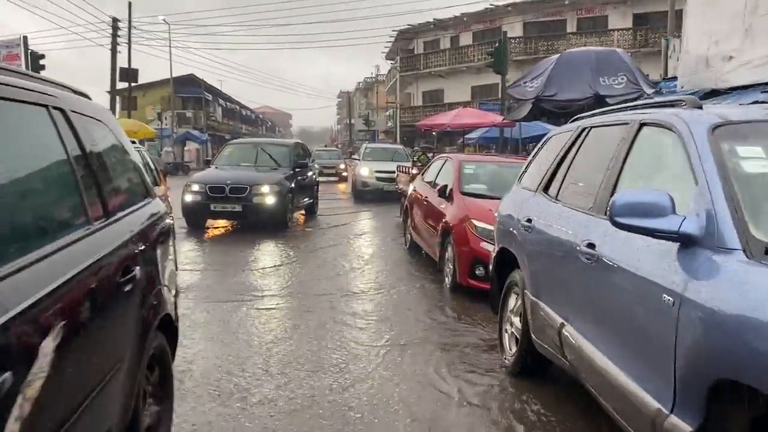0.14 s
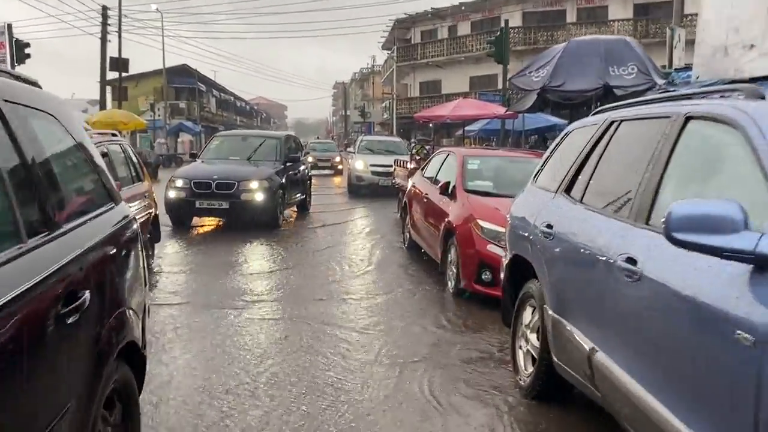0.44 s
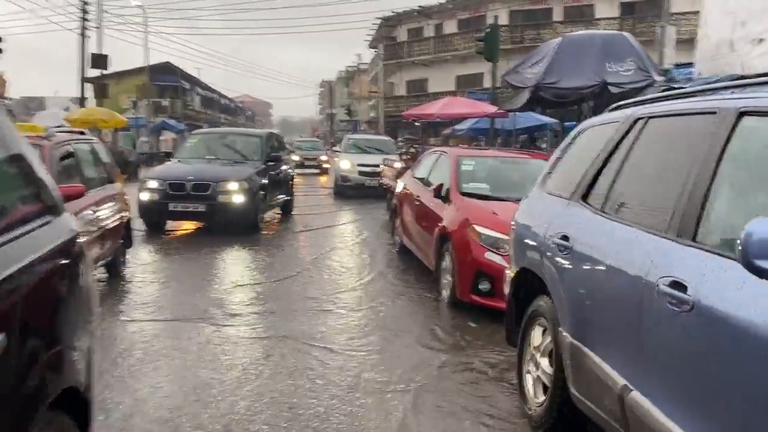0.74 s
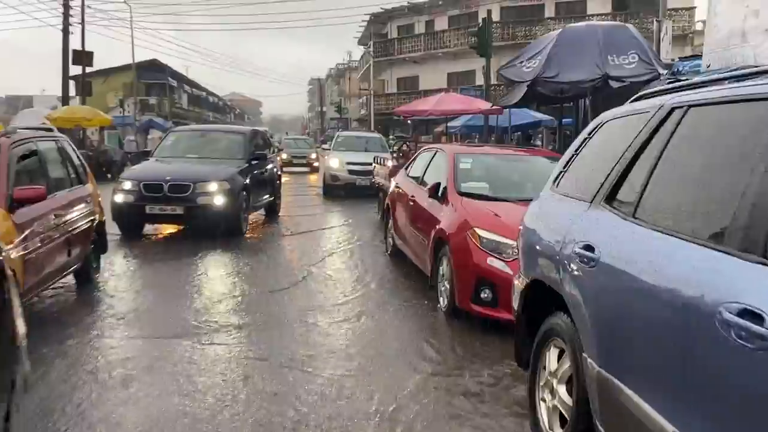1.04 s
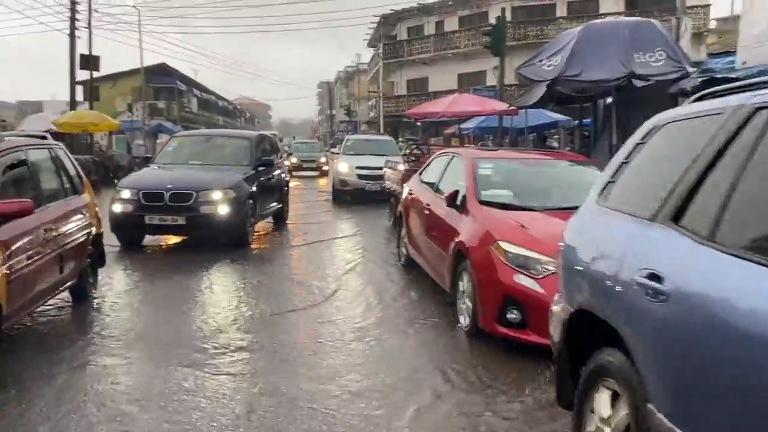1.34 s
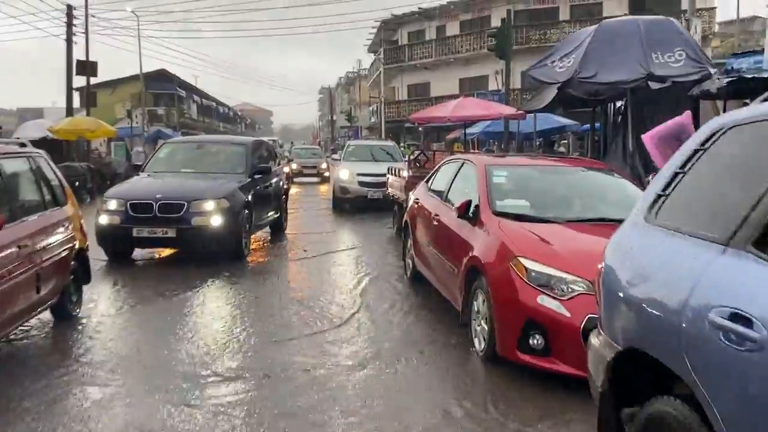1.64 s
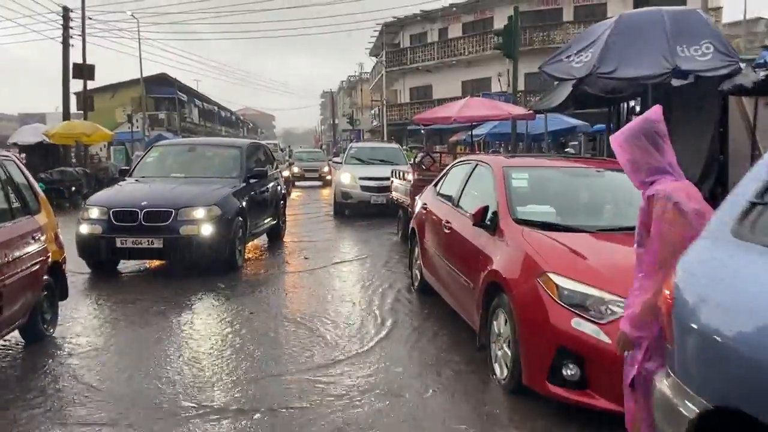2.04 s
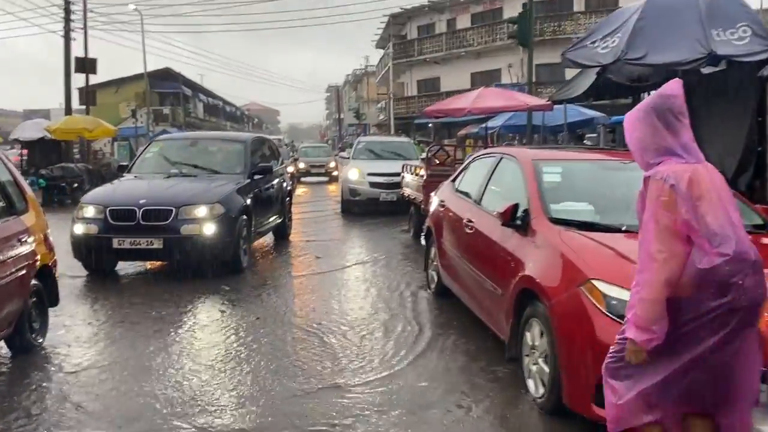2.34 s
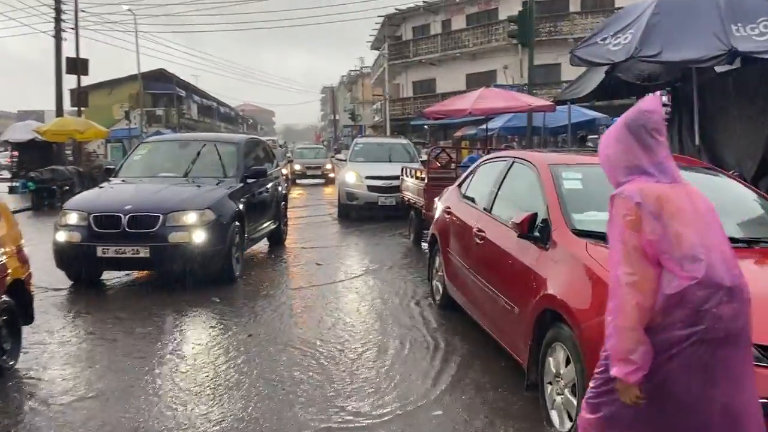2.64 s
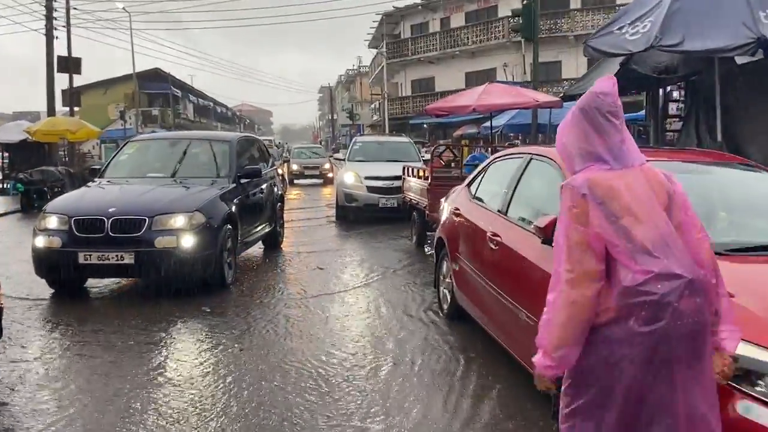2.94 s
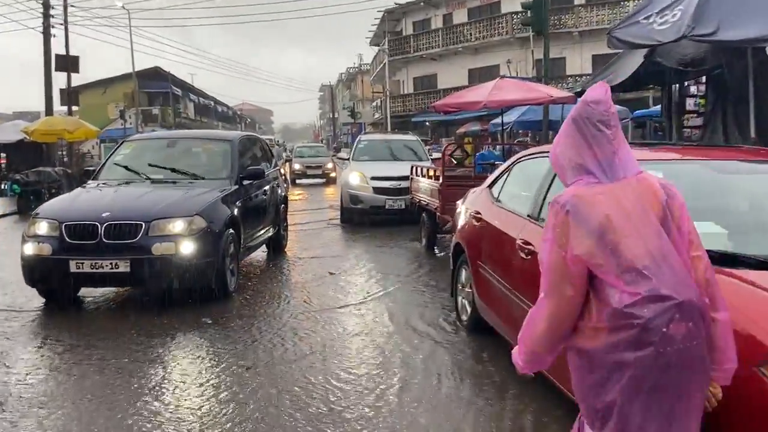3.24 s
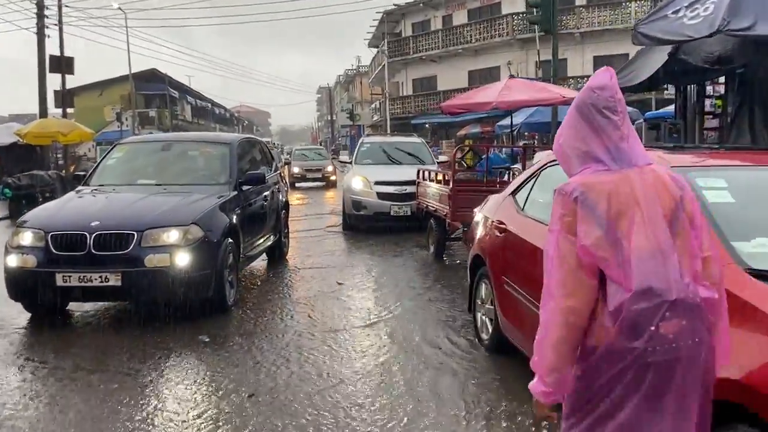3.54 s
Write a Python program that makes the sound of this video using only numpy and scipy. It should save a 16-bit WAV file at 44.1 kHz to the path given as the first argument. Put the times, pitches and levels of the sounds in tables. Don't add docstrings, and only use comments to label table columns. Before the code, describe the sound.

Dense rain hisses steadily outdoors, close to a stereo microphone. A faint, thin brake whistle comes early, brief watery splashes and drips follow, and a low pulsing engine idle rises in speed near the end.

```python
import sys
import numpy as np
from scipy import signal
from scipy.fft import rfft, irfft
from scipy.io import wavfile
from scipy.ndimage import uniform_filter1d

SR = 44100
rng = np.random.default_rng(int(sys.argv[2]) if len(sys.argv) > 2 else 0)


def master_out(mix):
    frames = np.transpose(np.atleast_2d(mix))
    ceiling = np.clip(frames, -1, 1)
    pcm = np.round(ceiling * 32767).astype(np.int16)
    wavfile.write(sys.argv[1], SR, pcm)


def natural_amplitude(level_db):
    exponent = np.asarray(level_db, float) / 20
    return 10 ** exponent


N = 163170
T = np.arange(N) / SR
HZ = np.maximum(np.arange(N // 2 + 1) * SR / N, 1.0)
LEFT_ONLY = np.array([[1], [0]])


def over_hz(table, hz=HZ):
    table = np.array(table)
    return np.interp(np.log(hz), np.log(table[:, 0]), table[:, 1])


def over_s(table):
    table = np.array(table)
    return np.interp(T, table[:, 0], table[:, 1])


def unit(x):
    return x / np.sqrt(np.mean(x ** 2))


def walk(rate_hz):
    hold = int(SR / rate_hz)
    steps = np.repeat(rng.standard_normal(N // hold + 1), hold)
    wander = uniform_filter1d(uniform_filter1d(steps, hold), hold)[:N]
    return (wander - wander.mean()) / wander.std()


def noise():
    return rng.standard_normal((2, N))


def filtered(x, gain):
    return irfft(rfft(x) * gain, N)


def banded(make, table, slow_db, quick_db):
    out = np.zeros((2, N))
    shared = walk(5.03)
    for hz in 25 * 2 ** (np.arange(28) / 3):
        if over_hz(table, hz) < -30 or hz < table[0][0] / 2:
            continue
        shape = np.cos(np.clip(3 * np.log2(HZ / hz), -1, 1) * np.pi / 2)
        spec = rfft(make(hz)) * shape
        density = np.sqrt(np.mean(abs(spec) ** 2) / np.mean(shape ** 2))
        band = irfft(spec / density * natural_amplitude(over_hz(table)), N)
        out += band * natural_amplitude(slow_db * shared + quick_db * walk(14))
    return unit(out)


def rain():
    # pitch_hz, level_db per Hz
    spectrum = [(150, -24), (500, -4), (1000, 2), (2100, -4), (4500, -12), (7000, -17), (11000, -21),
                (13000, -27.5), (15500, -29)]
    # time_s, level_db
    downpour = [
        (0, 0.5),
        (.6, 0.2),
        (1.3, -0.7),
        (1.8, -0.4),
        (2.6, -0.7),
        (3.1, 0.1),
        (3.7, 0.5),
    ]
    drops_per_s, size_db, drop_cycles = 2500, 1, 1.8
    chance = rng.random((2, N))
    hits = (chance[0] < drops_per_s / SR) * natural_amplitude(-size_db * np.log(chance[1] + 1e-9))

    def drops(hz):
        if hz < 280:
            return noise()
        struck = hits * (rng.random(N) < 0.3) * noise()
        pole = np.exp((2j * np.pi - 2 / drop_cycles) * hz / SR)
        ring = signal.lfilter([1], [1, -pole], struck).imag
        patter_db = -12.5 + 2.5 * np.log2(hz / 6000)
        return unit(noise()) + natural_amplitude(patter_db) * unit(ring)

    return banded(drops, spectrum, 0.057, 0.51) * natural_amplitude(-27.5 + over_s(downpour))


def traffic():
    # pitch_hz, level_db per Hz
    spectrum = [(25, -9.5), (55, -1.5), (85, 1), (125, -7), (170, -9), (380, -9.5), (600, -12.5),
                (1200, -36.5)]
    # time_s, level_db
    nearness = [
        (0, 1.5),
        (.4, 3),
        (.8, 2.5),
        (1.2, 1.5),
        (1.5, 1),
        (2.3, 1),
        (2.7, 1),
        (3.1, 2),
        (3.7, 1),
    ]
    # pitch_hz, level_db, unsteadiness_db
    motors = [(85, -62, -2), (148.4, -53, 8), (230.5, -48, 1), (378.4, -50.5, -0.5), (500, -42, 2.5),
              (695, -42.5, -1)]
    rumble = banded(lambda hz: noise(), spectrum, 0.47, 0.64) * natural_amplitude(-28.5 + over_s(nearness))
    hums = np.zeros(N)
    for hz, db, sway_db in motors:
        level = natural_amplitude(db + 1.0 + sway_db * walk(4))
        cycles = np.cumsum(hz * (1 + 0.0016 * walk(2.877))) / SR
        hums += level * np.sin(2 * np.pi * cycles)
    return rumble + hums * LEFT_ONLY


def engine():
    # time_s, level_db
    loudness = [(0, -16.5), (.3, -6), (.7, -5.5), (1.1, -4), (1.9, -1.5), (2.3, -3.5), (2.6, -2),
                (2.75, -4), (2.9, 0), (3.05, -1.5), (3.25, 0), (3.7, -3.5)]
    # time_s, cycle_hz
    speed = [
        (0, 7.29),
        (.55, 7.29),
        (.7, 7.25),
        (2.62, 7.25),
        (2.74, 7.5),
        (2.9, 8.45),
        (3.05, 9.35),
        (3.25, 9.6),
        (3.7, 9.25),
    ]
    # multiple of the cycle, idle_db, halfway_db, revved_db, polarity
    harmonics = [(4, -52, -37, -26, -1), (5, -46, -35, -31, -1), (6, -44, -30, -26.5, 1),
                 (7, -25.5, -37, -46, 1), (8, -15.5, -23, -39, 1), (9, -35, -33, -27, 1),
                 (12, -41, -42, -32, 1), (16, -37, -46, -50, 1)]
    # time_s, level_db
    unevenness = [
        (0, -8),
        (.7, -9),
        (1.0, 0),
        (1.6, 1),
        (1.9, 2.5),
        (2.3, 1.5),
        (2.6, 0),
        (3.7, -1),
    ]
    idle_hz, revved_hz, beat_at_s = 7.3, 9.3, 2.0336
    rate = over_s(speed)
    turns = np.cumsum(rate) / SR
    turns = turns - np.interp(beat_at_s, T, turns)
    throttle = (rate - idle_hz) / (revved_hz - idle_hz)
    out = np.zeros(N)
    for order, idle_db, half_db, revved_db, polarity in harmonics:
        order = round(order)
        weight_db = np.interp(throttle, [0, 0.5, 1], [idle_db, half_db, revved_db])
        lope_db = order % 2 * over_s(unevenness)
        level_db = 3.5 + weight_db + over_s(loudness) + lope_db + 0.35 * walk(4.76)
        out += np.sign(polarity) * natural_amplitude(level_db) * np.cos(2 * np.pi * order * turns)
    return out * LEFT_ONLY


def drips():
    # start_s, pitch_hz, level_db, ring_s, pitch spread 0-1
    big = [(.783, 3340, -41, .1, .006), (.934, 4320, -39.5, .09, .006), (1.035, 1900, -33, .05, .06),
           (1.067, 3300, -35, .03, .1), (1.073, 1650, -35, .07, .04), (1.0785, 4700, -31, .04, .12),
           (1.0805, 6300, -31, .03, .1), (1.483, 3870, -42, .09, .01), (1.49, 5780, -40, .08, .015),
           (1.868, 1780, -33, .08, .05), (2.406, 1290, -30, .07, .06), (2.485, 4450, -33.5, .1, .04),
           (2.492, 4750, -34, .08, .04), (2.506, 4480, -36, .05, .04), (2.937, 4520, -33, .09, .04),
           (2.937, 8500, -44, .05, .05), (3.1655, 2250, -30, .04, .08), (3.176, 2300, -33, .04, .08),
           (3.2333, 1050, -21, .06, .27), (3.241, 1000, -31, .05, .3)]
    # start_s, pitch_hz, level_db
    small = [(.006, 1400, -33), (.081, 3790, -38), (.09, 2750, -35), (.173, 7200, -42), (.315, 7800, -42),
             (.397, 4000, -38), (.925, 5150, -39), (1.036, 5400, -40), (1.424, 7600, -43),
             (1.447, 3800, -38), (1.826, 5850, -40), (1.895, 950, -37), (1.972, 3900, -38),
             (2.088, 2180, -35.5), (2.281, 6200, -41), (2.68, 7600, -41), (2.745, 4800, -40),
             (2.768, 4700, -39), (2.775, 5500, -40), (2.927, 5150, -40), (2.953, 6600, -41),
             (3.081, 4500, -39), (3.166, 5900, -38), (3.186, 5350, -40), (3.196, 2600, -35),
             (3.201, 7500, -43), (3.211, 5050, -38), (3.226, 4650, -39), (3.258, 5000, -37),
             (3.262, 5800, -41), (3.555, 2850, -35), (3.602, 6800, -41), (3.603, 1950, -33),
             (3.632, 4130, -38), (3.664, 3050, -35)]
    length = 8192
    out, u = np.zeros(N + length), T[:length]
    every = list(big) + [(s, hz, db, 0.055, 0.03) for s, hz, db in small]
    for s, hz, db, ring_s, spread in every:
        tones = np.zeros(length)
        for bubble in range(7):
            place = (bubble + rng.random() - 3.5) / 2
            phase = rng.random() / 3
            tones += np.sin(2 * np.pi * (hz * np.exp(spread * place) * u + phase))
        envelope = natural_amplitude(db - 60 * u / ring_s) * (1 - np.exp(-u / 0.0005))
        first = int(s * SR)
        out[first:first + length] += envelope * tones
    return out[:N] * np.array([[0.8], [0.65]])


def groans():
    # centre_s, pitch_hz, level_db, length_s, glide per s
    loads = [(0.121, 116, -29.5, 0.096, -0.52), (0.18, 87, -27.5, 0.076, 0.42),
             (0.342, 142, -28, 0.053, 0.44), (0.362, 245.7, -37, 0.061, 0.044),
             (0.68, 171.7, -37, 0.095, 0.48), (1.218, 232.2, -34, 0.075, -0.5), (2.93, 89, -28, 0.088, 0.1),
             (1.42, 85, -27.5, 0.14, -.15), (1.4, 75, -35, 0.078, 0.25), (1.8, 91, -50, 0.1, 0),
             (1.9, 400, -32.5, 0.059, -0.11), (2.6, 200, -34, 0.067, 0), (0.039, 380, -36, .03, 0.049),
             (0.493, 305, -37, 0.034, 0), (0.187, 600, -41, .02, 0), (3.578, 76, -32, 0.059, -0.011)]
    out = np.zeros(N)
    for s, hz, db, length_s, glide in loads:
        u = T - s
        swell = natural_amplitude(db + 3.5) * np.exp(-(u / length_s) ** 2)
        out += swell * np.sin(2 * np.pi * hz * u * (1 + glide * u / 2))
    return out * LEFT_ONLY


def ticks():
    # start_s, level_db
    impacts = [(0.1411, -32), (0.2997, -32), (0.4933, -26), (0.5616, -40), (1.0291, -29), (1.0789, -31.5),
               (1.4886, -28), (1.8452, -28), (1.9357, -35.5), (1.9934, -34), (2.0178, -25), (2.109, -28),
               (2.4039, -26), (2.4833, -26), (2.6389, -37), (2.6798, -34), (3.1547, -23), (3.4825, -29),
               (3.6361, -30)]
    decay_s, centre_hz, width_octaves = 0.0035, 8300, 1.1
    env = np.zeros(N)
    for s, db in impacts:
        env += natural_amplitude(db + 0.5) * (T >= s) * np.exp(-np.maximum(T - s, 0) / decay_s)
    bright = np.exp(-(np.log2(HZ / centre_hz) / width_octaves) ** 2)
    return env * unit(filtered(noise(), bright)) * 0.32


def splashes():
    # peak_s, level_db, length_s
    bursts = [(0.149, -32, 0.022), (0.313, -35, 0.028), (0.563, -32, 0.024), (1.067, -30.5, 0.037),
              (1.49, -27.5, 0.012), (1.973, -30, 0.049), (2.107, -31, 0.011), (2.395, -46, .012),
              (2.5, -33, .04), (2.906, -34, 0.11), (3.16, -34, .025), (3.21, -37.5, 0.093),
              (3.485, -31.5, 0.016), (3.593, -36.5, 0.2)]
    # pitch_hz, level_db per Hz
    spectrum = [(1200, 2), (3000, 5), (6000, -4), (11000, -3), (15500, -19)]
    env = np.zeros(N)
    for s, db, length_s in bursts:
        fall = np.maximum(T - s, 0) / length_s
        rise = np.maximum(s - T, 0) / (0.26 * length_s)
        env += natural_amplitude(db) * np.exp(-fall - rise)
    return env * unit(filtered(noise(), natural_amplitude(over_hz(spectrum))))


def brake():
    from_s, to_s, edge_s, slip_s = 0.175, 0.45, 0.012, 0.265
    env = np.clip((T - from_s) / edge_s, 0.1, 1) * np.exp(-np.maximum(T - to_s, 0) / 0.023)
    env = env * (1 - np.exp(-((T - slip_s) / 0.047) ** 2))
    cycles = np.cumsum(14425 * (1 + 0.00164 * walk(15))) / SR
    tone = np.sin(2 * np.pi * cycles)
    return env * natural_amplitude(-41 + 1.5 * walk(28)) * tone * np.array([[1], [0.2]])


def ports(pair):
    # pitch_hz, likeness 0-1
    likeness = [(60, 0.84), (170, 0.74), (400, 0.8), (750, 0.5), (1300, 0.31), (3500, 0.29), (5500, 0.59),
                (7300, 0.64), (8600, 0.91)]
    # pitch_hz, lead_rad
    phase = [(70, 0), (170, 0), (340, 0.3), (780, 4), (1700, 3), (2300, -0.8), (7000, -0.5)]
    # pitch_hz, level_db
    balance = [(60, 0.3), (700, 3.5), (1500, 1.55), (8000, 0.5)]
    treble_lag_s, treble_from_hz = 0.000242, 7370
    a, b = rfft(pair)
    like = np.clip(over_hz(likeness), 0, 1)
    lead = over_hz(phase) - 2 * np.pi * treble_lag_s * np.maximum(HZ - treble_from_hz, 0)
    half = natural_amplitude(over_hz(balance) / 2)
    left = a * half
    right = (like * a * np.exp(-1j * lead) + np.sqrt(1 - like ** 2) * b) / half
    return irfft(np.array([left, right]), N)


def scene():
    field = rain() + traffic() + engine() + groans() + ticks() + splashes() + brake()
    return ports(field) + drips()


def roll_off(x):
    return signal.sosfilt(signal.butter(12, 16790, fs=SR, output="sos"), x)


def record(dry):
    # pitch_hz, level_db
    response = [(12500, 0), (13800, 4), (14800, 1), (15150, 0), (15300, -10), (15780, -11)]
    mix = filtered(dry, natural_amplitude(over_hz(response)) * (HZ < 15780))
    return roll_off(mix)


dry = scene()
out = record(dry)
master_out(out)
```